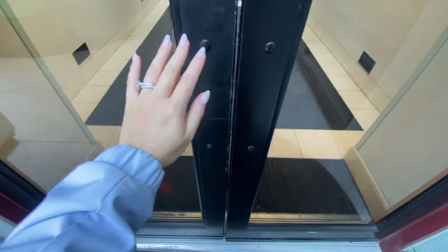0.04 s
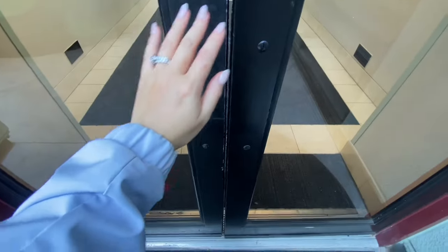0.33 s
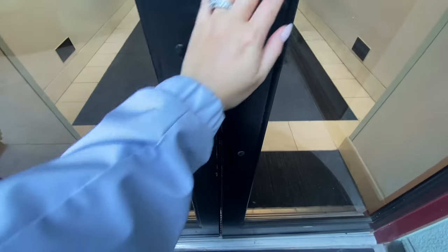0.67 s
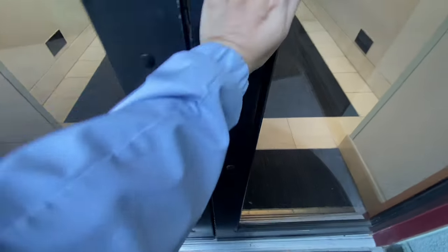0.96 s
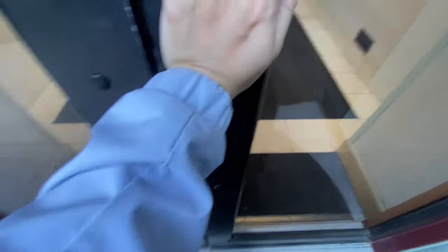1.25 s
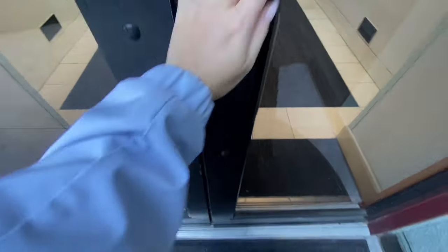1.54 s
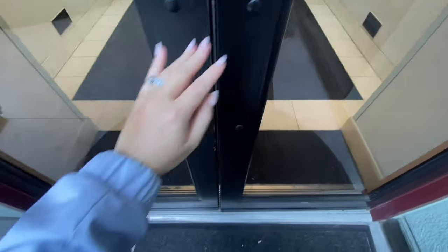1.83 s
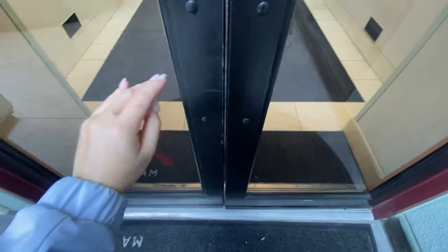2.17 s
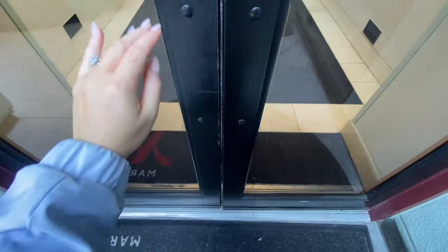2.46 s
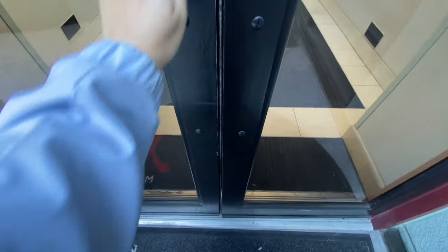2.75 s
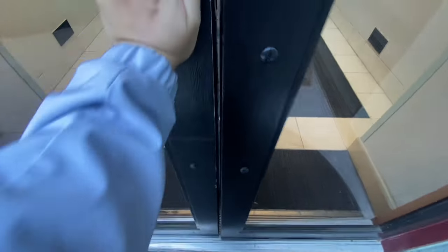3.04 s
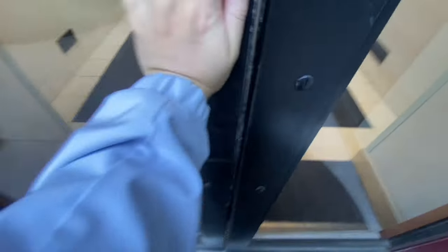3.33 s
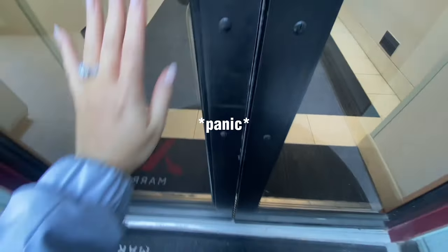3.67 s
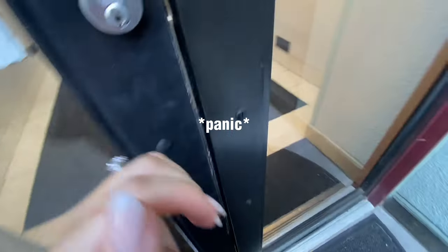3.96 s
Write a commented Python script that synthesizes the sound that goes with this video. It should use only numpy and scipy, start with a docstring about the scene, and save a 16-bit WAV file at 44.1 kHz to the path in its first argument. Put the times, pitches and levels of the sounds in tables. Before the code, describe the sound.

A locked glass door clunks twice and rattles its metal latch, close to the microphone. Fingernail taps and a soft palm contact on the frame follow, while a nylon sleeve swishes over low street traffic and an idling engine.

```python
"""A hand tries a locked glass double door from the street, close up, over traffic and an idling engine.
A nylon sleeve swishes with each reach. At 0.9 s fingernails tap the metal frame and the latch scrapes;
at 1.0 and 1.4 s the heavy pane clunks as it takes up its play. From 2.9 s come more taps and clicks,
the door's sound shifts to the right, and a palm lands on the stile. From 3.6 s a second engine swells."""
import sys
import numpy as np
from scipy import signal
from scipy.fft import rfft, irfft
from scipy.io import wavfile
from scipy.ndimage import uniform_filter1d

SR = 44100
rng = np.random.default_rng(int(sys.argv[2]) if len(sys.argv) > 2 else 0)


def to_wav(s):
    """Save 16-bit WAV."""
    ch = np.atleast_2d(s).T  # columns
    pcm = np.round(np.clip(ch, -1, 1) * 32767)  # PCM
    wavfile.write(sys.argv[1], SR, pcm.astype(np.int16))


N = 176400


def amp(db):
    """Decibels to gain."""
    return 10 ** (np.asarray(db) / 20)


def unit(x):
    """Scale to rms 1."""
    return x / np.sqrt(np.mean(x ** 2) + 1e-20)


def curve_at(points, hz):
    """Interpolate (freq_hz, value) points over log frequency."""
    freq_hz, value = np.transpose(points)
    return np.interp(np.log(hz + 1), np.log(freq_hz + 1), value)


def envelope(points):
    """Gain over time from (time_s, level_db) points."""
    return amp(np.interp(np.arange(N) / SR, *np.transpose(points)))


def bell(hz, centre_hz, spread_oct):
    """Gaussian weight over log frequency."""
    return np.exp(-.5 * (np.log2(hz / centre_hz) / spread_oct) ** 2)


def add(mix, start_s, sound):
    """Mix a sound in at start_s."""
    part = mix[..., round(start_s * SR):][..., :sound.shape[-1]]
    part += sound[..., :part.shape[-1]]


def drift(samples):
    """Smooth random wander, rms 1."""
    return unit(uniform_filter1d(uniform_filter1d(rng.standard_normal(N), samples), samples))


def pair(noise, correlation):
    """Two independent noises to two partly alike channels."""
    return np.array([noise[0], correlation * noise[0] + np.sqrt(1 - correlation ** 2) * noise[1]])


def delay_left(x, lag_s):
    """Delay the left channel; a negative lag makes it lead."""
    hz = np.fft.rfftfreq(N, 1 / SR)
    return np.array([irfft(rfft(x[0]) * np.exp(-2j * np.pi * hz * lag_s), N), x[1]])


def wash(spectrum, patch_db, frame_samples):
    """Shaped stereo noise with drifting patches, rms 1, wider in the treble."""
    # left-right likeness: freq_hz, correlation
    likeness = [(30, 0.94), (80, 0.97), (140, 0.92), (260, 0.74), (500, 0.63), (1000, 0.065), (8000, 0.033)]
    hz = np.fft.rfftfreq(frame_samples, 1 / SR)
    noise = rng.standard_normal((5, len(hz), N * 4 // frame_samples + 5))
    patches = unit(uniform_filter1d(uniform_filter1d(noise[4], size=8, axis=0), size=8, axis=1))
    bins = pair(noise[:2] + 1j * noise[2:4], curve_at(likeness, hz)[:, None])
    bins *= amp(curve_at(spectrum, hz)[:, None] + patch_db * patches)
    return unit(signal.istft(bins, nperseg=frame_samples, noverlap=frame_samples * 3 // 4)[1][:, :N])


def doorway(x, tail_db):
    """Add early reflections from the recess and a short diffuse tail."""
    # doorway reverberation: freq_hz, t60_s
    decay = [(100, 0.75), (1000, 0.33), (3000, 0.33), (9000, 0.1)]
    early_over_tail_db, early_decay_s = 5.5, 0.016
    hz, t, bins = signal.stft(rng.standard_normal((2, SR // 2)), SR, nperseg=256)
    tail = signal.istft(bins * amp(-60 * t / curve_at(decay, hz)[:, None]), SR, nperseg=256)[1]
    t = np.arange(tail.shape[1]) / SR
    early = rng.standard_normal(tail.shape) * (rng.random(tail.shape) < .05) * np.exp(-t / early_decay_s)
    echo = tail / np.linalg.norm(tail[0]) + amp(early_over_tail_db) * early / np.linalg.norm(early[0])
    return x + amp(tail_db) * signal.fftconvolve(x, echo, axes=1)[:, :N]


def traffic():
    """Low, slowly shifting street rumble."""
    # rumble spectrum: freq_hz, relative_db
    spectrum = [(20, -7.5), (35, -44), (52, -0.5), (65, 3), (85, -0.5), (115, -4), (160, -5.5),
                (230, -10.5), (310, -20.5), (420, -17), (650, -24), (1000, -26), (1500, -35), (2500, -42.5),
                (4500, -53), (9000, -58.5), (12000, -75)]
    return amp(-45.5) * wash(spectrum, patch_db=2, frame_samples=4096)


def idling_engine():
    """Low partials, each wavering in level and pitch."""
    # idle hum: pitch_hz, level_db
    partials = [(87, -56), (177, -69.5), (264, -67.5), (414, -73.5)]
    out = np.zeros(N)
    for pitch_hz, level_db in partials:
        gain = np.sqrt(2) * amp(level_db) * (1 + 0.39 * drift(samples=3000))
        cycles = np.cumsum(pitch_hz * (1 + 0.021 * drift(samples=2500))) / SR
        out += gain * np.sin(2 * np.pi * cycles)
    return out


def swelling_engine():
    """Fluttering harmonics of one wavering pitch, rising in level near the end."""
    # engine swell: time_s, level_db
    swell = [(3.55, -94), (3.68, -59), (3.77, -52.5), (3.88, -53.5), (4, -52.5)]
    # engine orders: multiple, relative_db
    orders = [(1, 1), (2, 1), (3, -3), (4, -7.5), (5, -3), (7, -4.5), (9, -13.5)]
    pitch_hz = 74.3
    cycles = np.cumsum(pitch_hz * (1 + .016 * drift(samples=2000))) / SR
    out = np.zeros(N)
    for multiple, relative_db in orders:
        flutter = 1 + .4 * drift(samples=700)
        out += amp(relative_db) * flutter * np.sin(2 * np.pi * (multiple * cycles + rng.random()))
    return envelope(swell) * out


def sleeve():
    """Grainy nylon hiss that follows the arm."""
    # arm movement: time_s, level_db
    movement = [(.1, -79.5), (.33, -84), (.48, -77), (.78, -65.5), (.92, -68.5), (1.1, -61.5),
                (1.34, -69.5), (1.5, -63.5), (1.68, -69), (2.22, -71), (2.42, -82), (2.6, -73.5),
                (2.76, -68.5), (3.07, -63), (3.28, -57), (3.38, -62.5), (3.6, -62), (3.82, -68.5),
                (3.92, -63.5), (4, -63)]
    # nylon spectrum: freq_hz, relative_db
    nylon = [(300, 0.5), (900, 3.5), (1600, -4), (2700, -3), (5200, -8), (6400, -7.5), (9000, -6),
             (10500, -12), (12000, -20.5)]
    hiss = wash(nylon, patch_db=2, frame_samples=256)
    grain = np.exp(0.028 * drift(samples=60))
    return envelope(movement) * unit(hiss * grain)


def palm():
    """A few soft contacts ring the hollow metal stile."""
    # palm contacts: start_s, level_db, centre_hz
    contacts = [(3.123, -40.5, 430), (3.1285, -36.5, 820), (3.146, -43.5, 564)]
    # stile modes: pitch_hz, mode_db, t60_s
    modes = [(449, 4.5, 0.054), (669.7, -2.5, 0.19), (772, -2.5, 0.079), (820, -6, 0.078), (1293, -7, 0.11)]
    rise_s = 0.0028
    out, t = np.zeros((2, N)), np.arange(SR // 4) / SR
    rise = np.minimum(t / rise_s, 1)
    for start_s, level_db, centre_hz in contacts:
        for pitch_hz, mode_db, t60_s in modes:
            ring = amp(level_db + mode_db - 60 * t / t60_s) * np.sin(2 * np.pi * pitch_hz * t)
            add(out, start_s, bell(pitch_hz, centre_hz, spread_oct=0.71) * rise * ring)
    return doorway(out, tail_db=-10.5)


def nails():
    """Nails, a finger ring and loose fittings tap the frame: a tick and two smeared tones each."""
    # taps: start_s, level_db, low_hz, high_hz, high_db, t60_s, tick_db
    taps = [(0.9197, -31.5, 1530, 2980, -13.5, 0.011, -13), (0.9235, -40, 1500, 2760, 6.5, 0.012, -15.5),
            (1.205, -50, 1036, 1210, -9, 0.059, -14), (1.3675, -42, 2105, 2370, -10, 0.03, -14),
            (1.497, -51.5, 3150, 4210, 5.5, 0.033, -12), (1.7408, -48, 3370, 3910, 3, 0.012, -6.5),
            (2.9029, -50, 2170, 4550, 4.5, 0.051, -11), (2.931, -35, 2100, 4290, -1, 0.025, -22),
            (3.159, -39.5, 2750, 2980, 3, 0.024, -20), (3.2934, -37.5, 960, 1560, -3, 0.0094, -2.5),
            (3.722, -54, 1760, 2140, 6.5, 0.039, -3.5)]
    rise_s, tick_decay_s, linewidth_hz = 0.00092, 0.002, 110
    out, t = np.zeros((2, N)), np.arange(4096) / SR
    for start_s, level_db, low_hz, high_hz, high_db, t60_s, tick_db in taps:
        phase = rng.uniform(0, 2 * np.pi, (2, 1, 1)) + rng.normal(0, 0.17, (2, 2, 1))  # tone, channel
        walk = np.cumsum(rng.standard_normal((2, 1, len(t))), axis=2)
        phase = phase + walk * np.sqrt(2 * np.pi * linewidth_hz / SR)
        low = np.sin(2 * np.pi * low_hz * t + phase[0])
        high = amp(high_db) * np.sin(2 * np.pi * high_hz * t + phase[1])
        ring = (low + high) * amp(-60 * t / t60_s)
        tick_band = signal.butter(2, [low_hz * 0.75, high_hz * 0.91], "band", fs=SR)
        tick = unit(signal.lfilter(*tick_band, rng.standard_normal((2, len(t)))))
        tick *= amp(tick_db) * (1 + amp(high_db)) * np.exp(-t / tick_decay_s)
        add(out, start_s, amp(level_db) * np.minimum(t / rise_s, 1) * (ring + tick))
    return doorway(out, tail_db=-13)


def frame_ring(contact):
    """Resonance of the metal frame, driven by the contact sound."""
    # frame modes: pitch_hz, over_contact_db, t60_s
    modes = [(1194, 9, 0.09), (1706, -8, 0.13), (1779, 2.5, 0.12), (1820, -12, 0.13), (2100, 0, 0.1),
             (2510, 1, .12), (2603, 7, 0.11), (2790, 7, 0.1), (3080, -1, 0.13), (3634, -4, 0.12),
             (4357, 0, 0.15), (4440, 3, .17), (6120, 5, 0.029)]
    t = np.arange(SR // 2) / SR
    response = np.zeros(len(t))
    for pitch_hz, over_contact_db, t60_s in modes:
        unity_peak = 2 * np.log(1000) / (t60_s * SR)
        response += unity_peak * amp(over_contact_db - 60 * t / t60_s) * np.cos(2 * np.pi * pitch_hz * t)
    return signal.fftconvolve(contact, response[None], axes=1)[:, :N]


def latch():
    """Bursts of tiny metal-on-metal impacts ring the frame."""
    # clicks and scrapes: start_s, rise_s, decay_s, low_db, mid_db, high_db
    contacts = [(0.973, 0.003, 0.023, -37.5, -43, -49.5), (.983, 0.0027, 0.015, -40, -27.5, -59),
                (.999, 0.0014, 0.018, -37, -35, -47), (1.024, 0.0031, 0.0028, -30.5, -30, -35),
                (1.031, 0.00077, .011, -53, -44, -58), (1.1579, .0007, 0.0055, -67, -46.5, -45),
                (1.273, 0.0018, 0.0041, -47, -48.5, -41.5), (1.313, 0.0018, 0.0083, -43, -52, -79),
                (1.367, 0.0015, 0.004, -44, -38, -43.5), (1.377, .002, 0.013, -47, -47.5, -61),
                (1.398, 0.0012, 0.012, -37, -46, -52.5), (1.410, 0.0008, 0.013, -37, -46, -53),
                (1.4245, 0.0016, 0.0089, -60, -37.5, -56), (1.495, 0.0014, 0.0034, -60, -63, -50),
                (1.5075, 0.00057, .006, -41, -44, -52), (1.609, 0.0022, 0.0061, -55, -54, -53.5),
                (2.9036, 0.00027, 0.0018, -55, -60, -38.5), (3.112, 0.0016, 0.013, -53, -43.5, -45),
                (3.157, 0.00099, 0.015, -43.5, -38, -48), (3.2913, 0.001, 0.0026, -47, -38.5, -42),
                (3.388, 0.0016, 0.014, -45, -52, -53), (3.503, 0.0023, 0.0028, -35, -55, -75),
                (3.525, 0.001, 0.0033, -52, -44.5, -59)]
    highpass_hz, lowpass_hz, bump_hz, bump_db = 410, 8300, 5100, 1
    out, t = np.zeros((2, N)), np.arange(8192) / SR
    hz = np.fft.rfftfreq(len(t), 1 / SR)
    band = 1 / np.sqrt((1 + (highpass_hz / (hz + 1)) ** 6) * (1 + (hz / lowpass_hz) ** 12))
    band *= amp(bump_db * np.exp(-((hz - bump_hz) / 600) ** 2))
    for start_s, rise_s, decay_s, low_db, mid_db, high_db in contacts:
        noise = pair(rng.standard_normal((2, len(t))), correlation=0.44)
        chatter = np.exp(0.34 * np.repeat(rng.standard_normal(len(t) // 32), 32))
        force = np.minimum(t / rise_s, 1) * np.exp(-np.maximum(t - rise_s, 0) / decay_s)
        colour = amp(curve_at([(800, low_db), (2300, mid_db), (7000, high_db)], hz))
        burst = irfft(rfft(unit(noise * chatter) * force) * colour * band)
        add(out, start_s, burst[:, :len(t) * 3 // 4])
    return doorway(out + frame_ring(out), tail_db=-8.5)


def pane():
    """Each blow knocks and rings the glass; low bending waves arrive last, so the pitch falls."""
    # door meets its stop: start_s, level_db, centre_hz, spread_oct, travel_s (at 100 Hz), knock_db
    blows = [(0.9971, -23.5, 166, 1.11, 0.00687, -6.5), (1.03, -36.5, 60, 0.73, 0.0067, -6),
             (1.408, -24, 164, 0.93, 0.00564, -3.5), (1.456, -35, 172, 0.46, 0.00645, -9)]
    # bending modes: pitch_hz, mode_db, t60_s
    modes = [(58.94, 1, 0.61), (87.84, -5.5, 0.69), (108.8, 9, 0.095), (163, -2.5, 0.087),
             (229.2, -1.5, 0.14), (272.3, -4, 0.12), (354, -3, 0.1), (464.6, 1.5, 0.053), (522, -2.5, 0.1)]
    lowpass_hz, rise_cycles, left_db = 700, 0.49, -5.5
    out, t = np.zeros((2, N)), np.arange(SR * 3 // 4) / SR
    hz = np.fft.rfftfreq(len(t), 1 / SR) + 1e-3
    for start_s, level_db, centre_hz, spread_oct, travel_s, knock_db in blows:
        dispersion = np.exp(-4j * np.pi * travel_s * np.sqrt(100 * hz))
        spectrum = bell(hz, centre_hz, spread_oct=0.87) / (1 + (hz / lowpass_hz) ** 4)
        knock = irfft(spectrum * dispersion)[:len(t) // 2]
        add(out, start_s, amp(level_db + knock_db) * knock / abs(knock).max())
        for pitch_hz, mode_db, t60_s in modes:
            age_s = np.maximum(t - travel_s * np.sqrt(100 / pitch_hz), 0)
            rise = 1 - np.exp(-age_s * pitch_hz / rise_cycles)
            ring = amp(level_db + mode_db - 60 * age_s / t60_s) * np.sin(2 * np.pi * pitch_hz * age_s)
            add(out, start_s, bell(pitch_hz, centre_hz, spread_oct) * rise * ring)
    return doorway(out, tail_db=-17) * amp([[left_db], [0]])


def scene():
    """Door, sleeve and street; the door leads on the left, then on the right after shift_s."""
    shift_s, crossfade_s, street_left_db = 3.0, 0.1, -2
    door = pane() + latch() + nails() + palm()
    shift = np.clip((np.arange(N) / SR - shift_s) / crossfade_s, 0, 1)
    door = (1 - shift) * delay_left(door, lag_s=-0.00007) + shift * delay_left(door, lag_s=0.00027)
    foreground = door + sleeve()
    street = (idling_engine() + swelling_engine() + traffic()) * amp([[street_left_db], [0]])
    return foreground + delay_left(street, lag_s=-.0004)


def record(dry):
    """Two microphones with unlike treble, then a low-pass."""
    # left microphone response: freq_hz, gain_db
    mic_left = [(1000, 1), (6500, -1), (8200, -3.5), (9200, -6), (10200, -12), (12000, -10)]
    # right microphone response: freq_hz, gain_db
    mic_right = [(1000, 0), (8200, -1.5), (9500, -1.5), (12000, -7.5)]
    cutoff_hz = 12300
    hz = np.fft.rfftfreq(N, 1 / SR)
    soft_ends = signal.windows.tukey(N, .003)
    heard = irfft(rfft(dry * soft_ends) * amp([curve_at(mic_left, hz), curve_at(mic_right, hz)]), N)
    lowpass = signal.firwin(255, cutoff_hz, window=("kaiser", 7), fs=SR)
    return signal.oaconvolve(heard, lowpass[None], "same")


dry = scene()
out = record(dry)
to_wav(out)
```